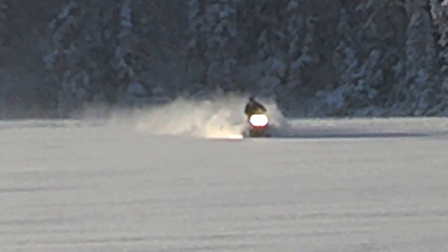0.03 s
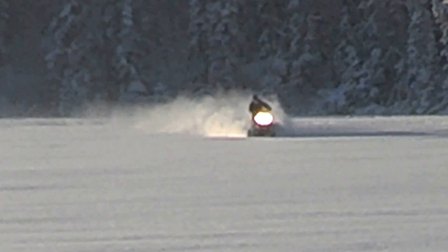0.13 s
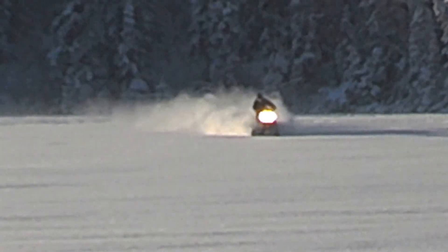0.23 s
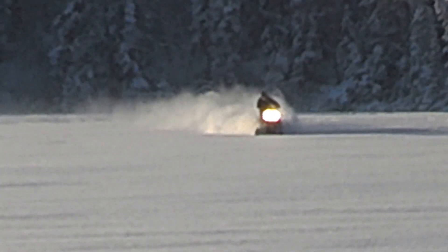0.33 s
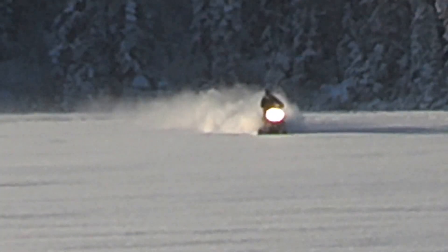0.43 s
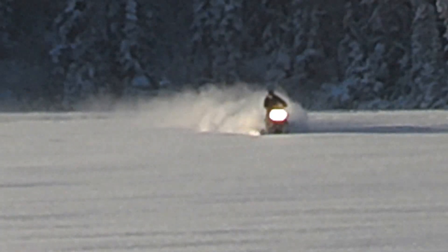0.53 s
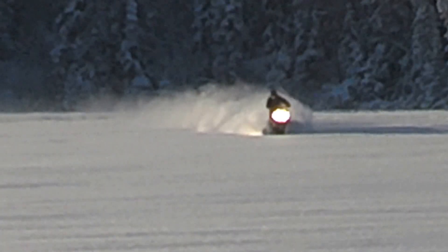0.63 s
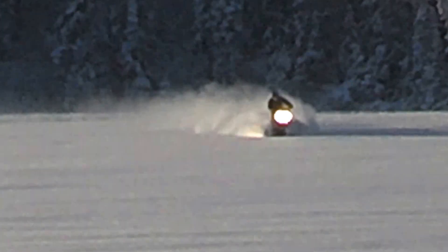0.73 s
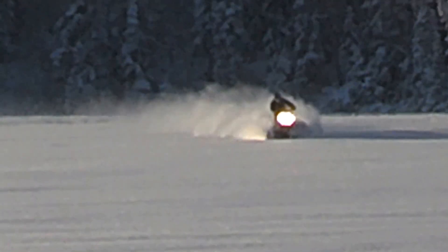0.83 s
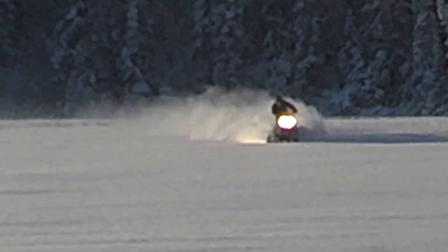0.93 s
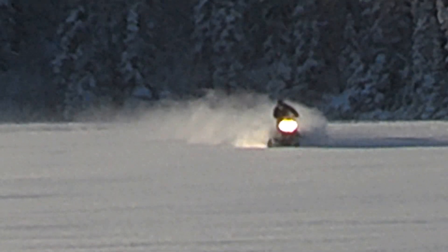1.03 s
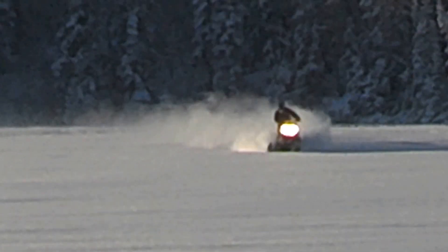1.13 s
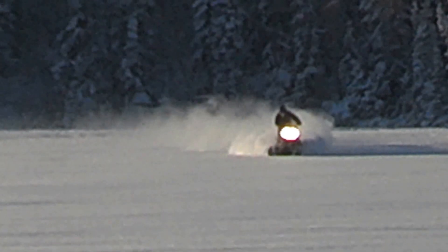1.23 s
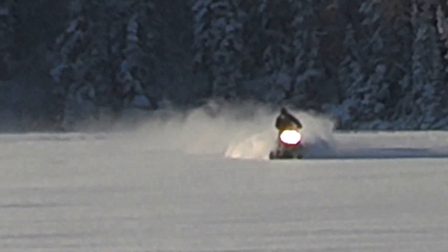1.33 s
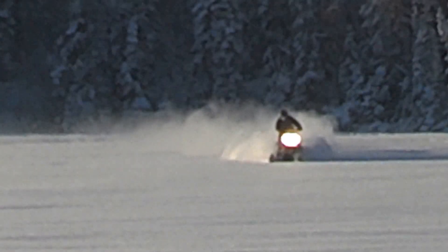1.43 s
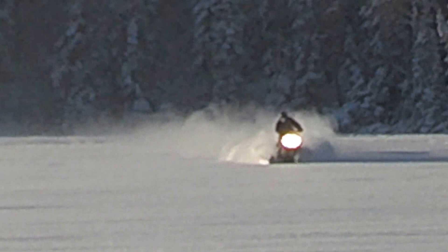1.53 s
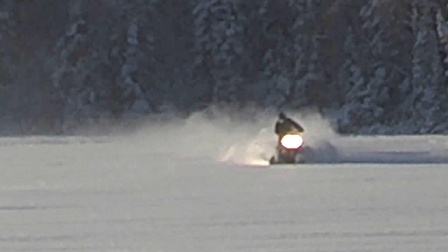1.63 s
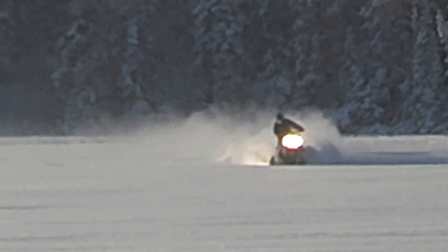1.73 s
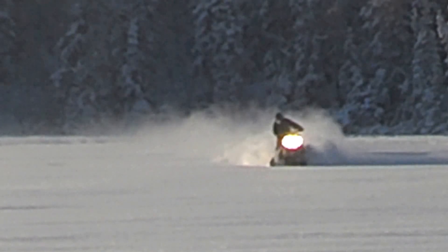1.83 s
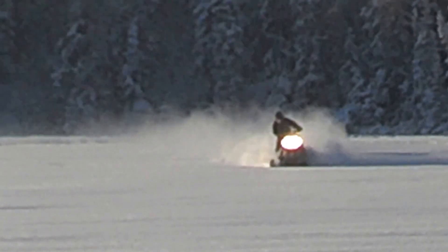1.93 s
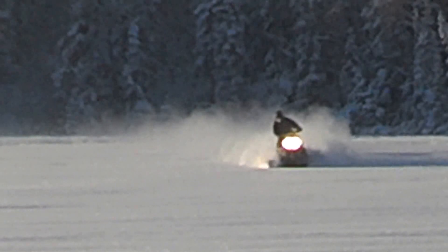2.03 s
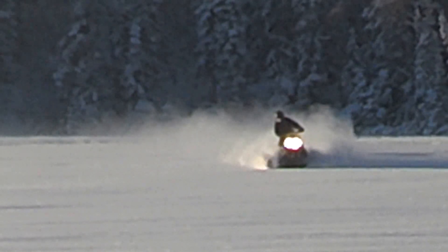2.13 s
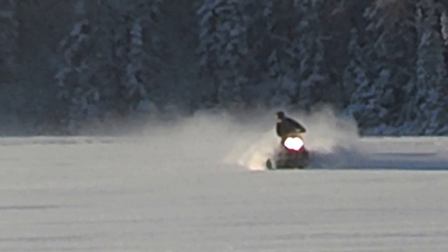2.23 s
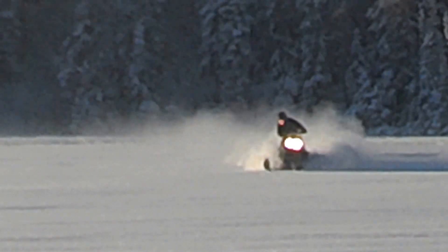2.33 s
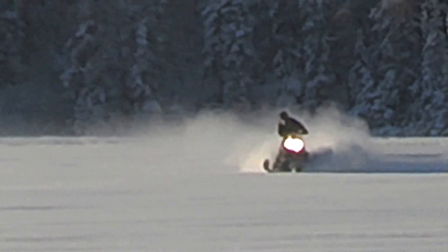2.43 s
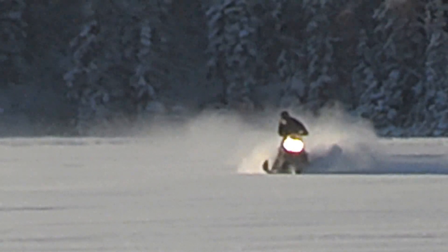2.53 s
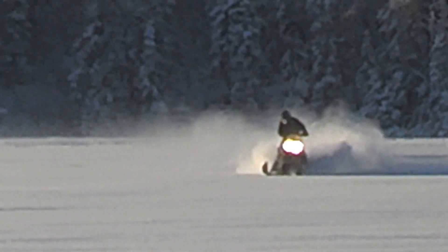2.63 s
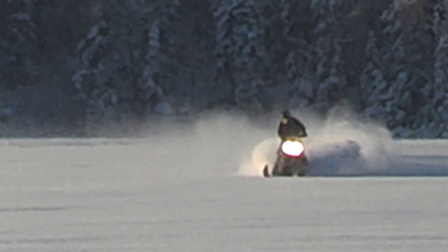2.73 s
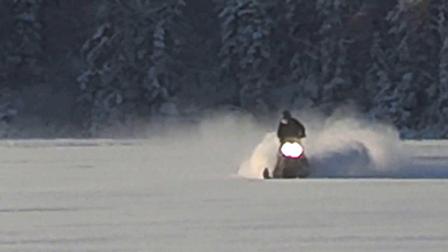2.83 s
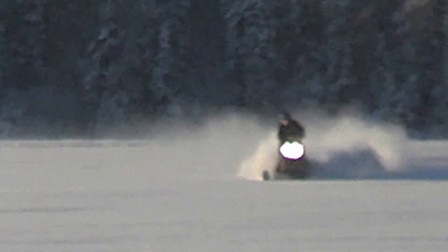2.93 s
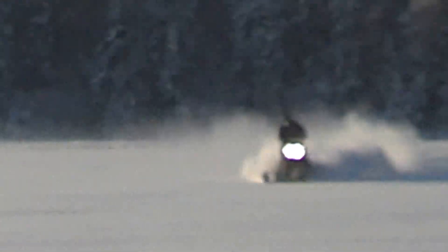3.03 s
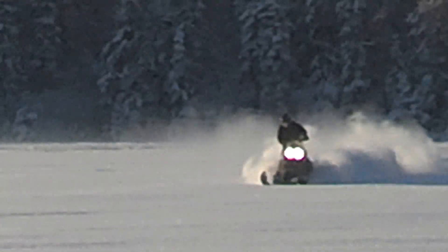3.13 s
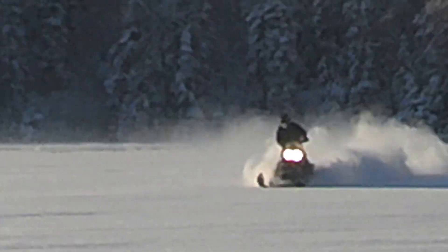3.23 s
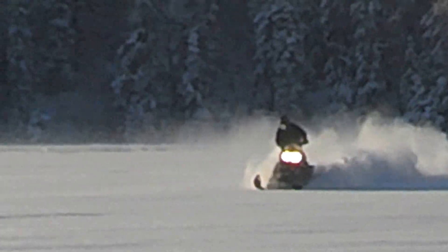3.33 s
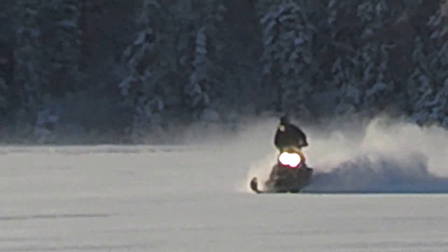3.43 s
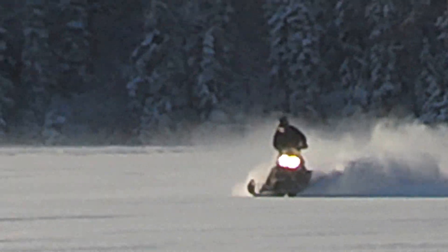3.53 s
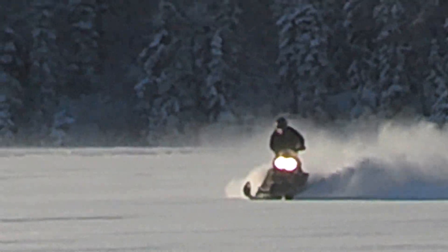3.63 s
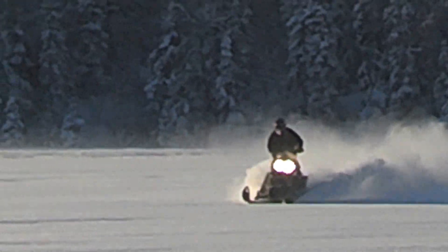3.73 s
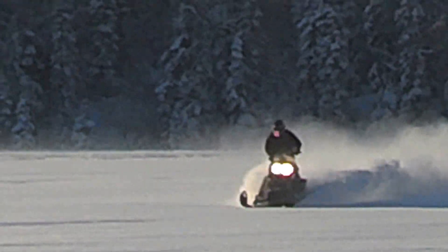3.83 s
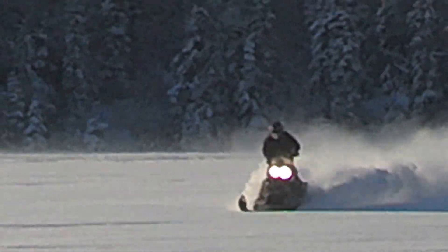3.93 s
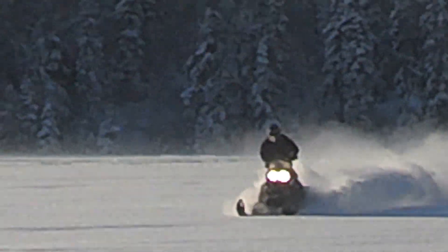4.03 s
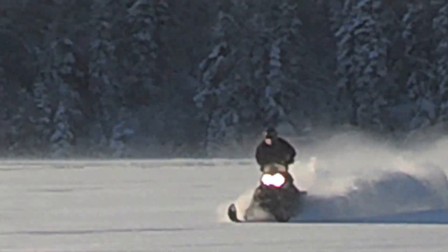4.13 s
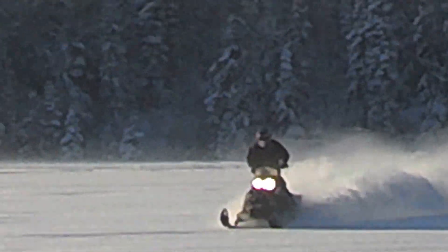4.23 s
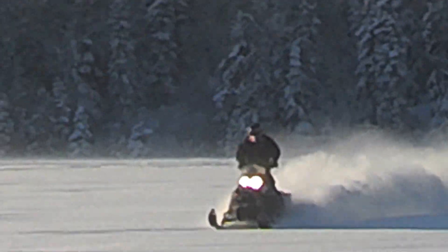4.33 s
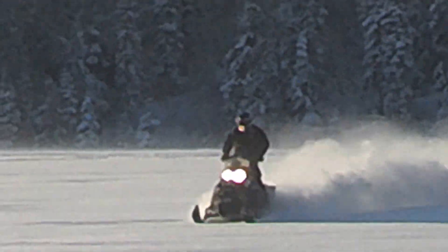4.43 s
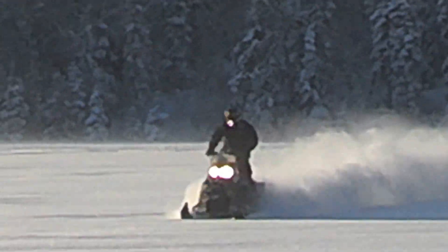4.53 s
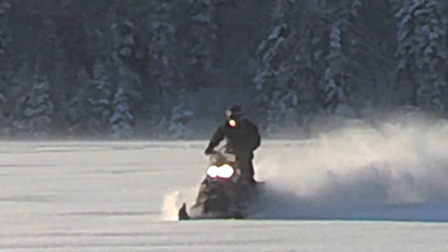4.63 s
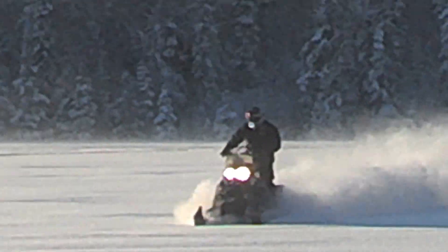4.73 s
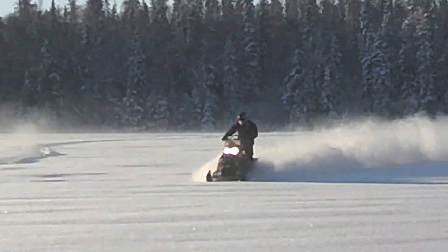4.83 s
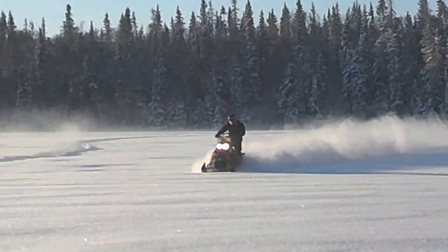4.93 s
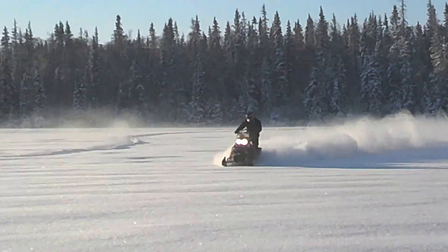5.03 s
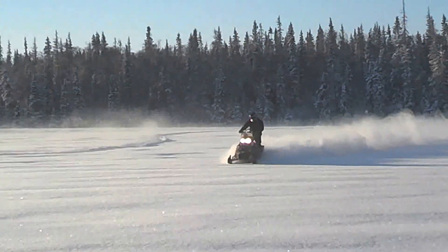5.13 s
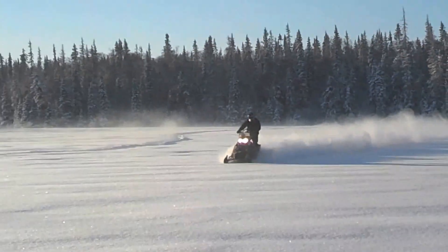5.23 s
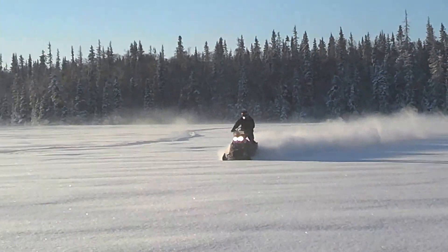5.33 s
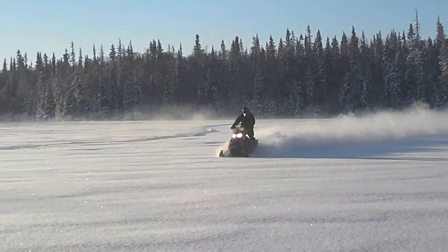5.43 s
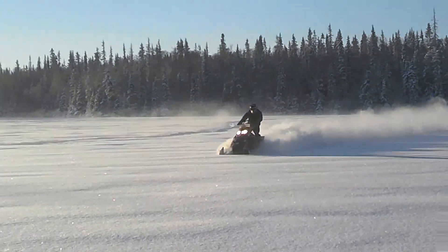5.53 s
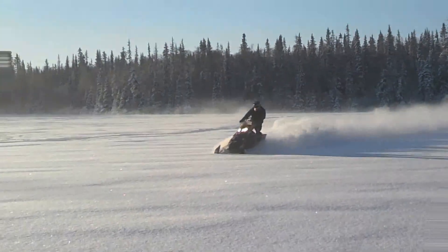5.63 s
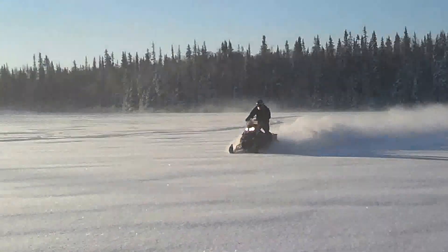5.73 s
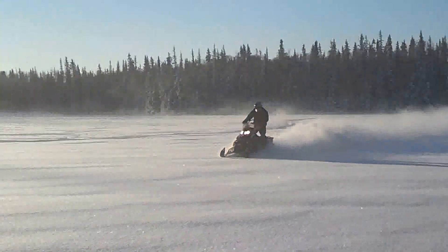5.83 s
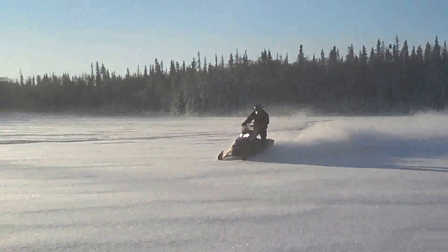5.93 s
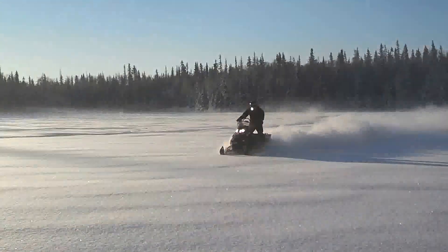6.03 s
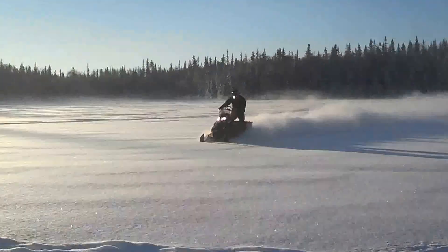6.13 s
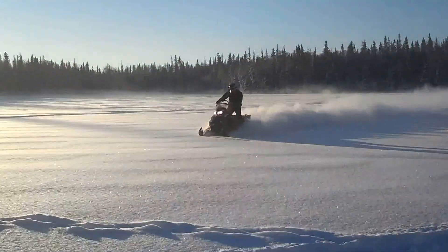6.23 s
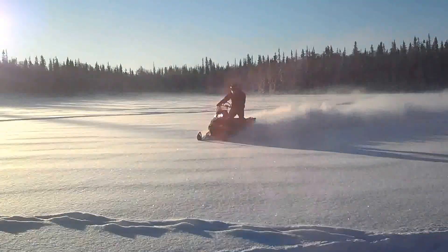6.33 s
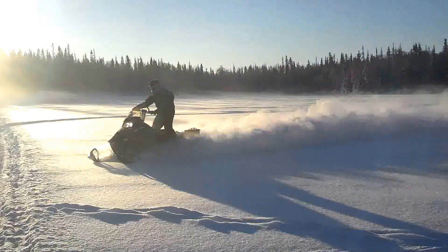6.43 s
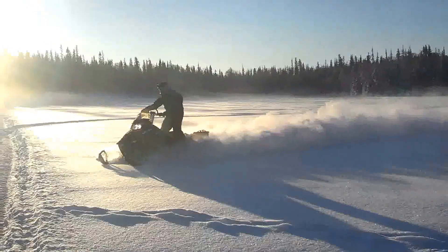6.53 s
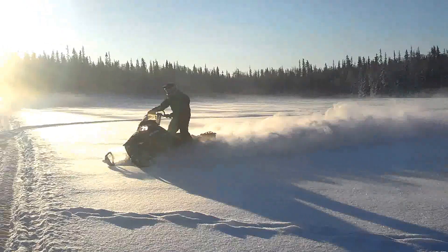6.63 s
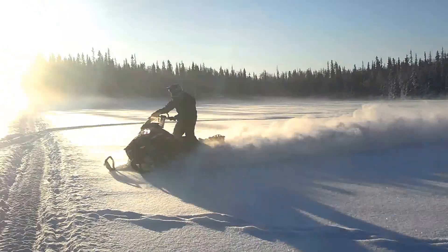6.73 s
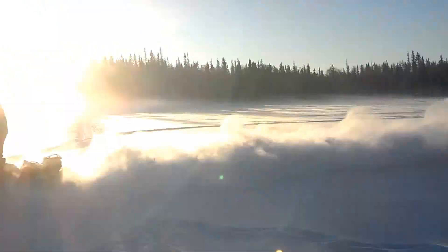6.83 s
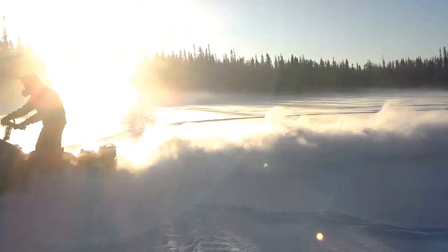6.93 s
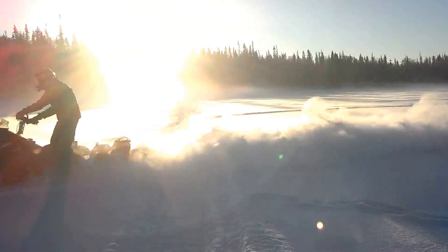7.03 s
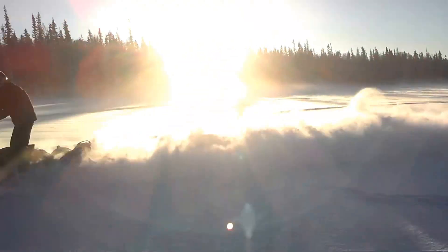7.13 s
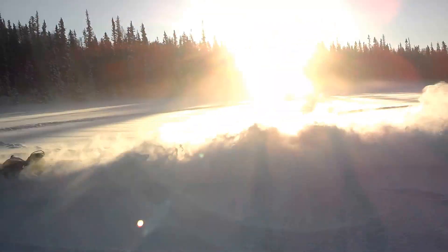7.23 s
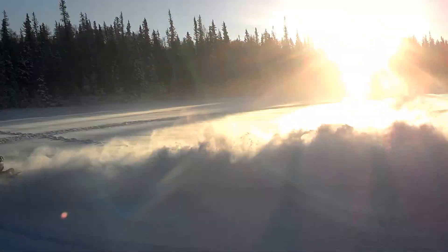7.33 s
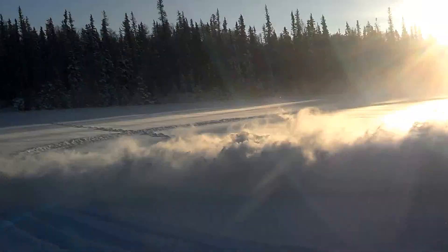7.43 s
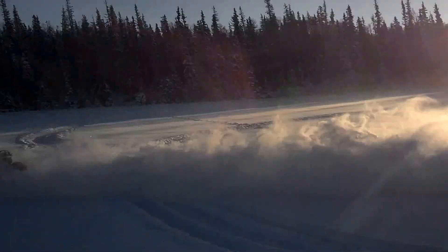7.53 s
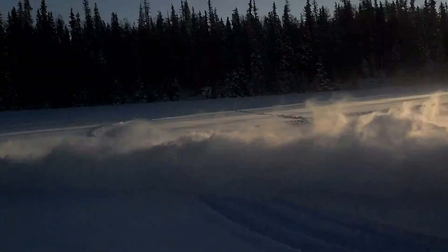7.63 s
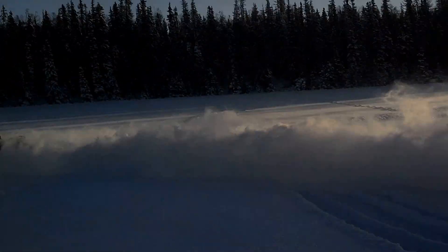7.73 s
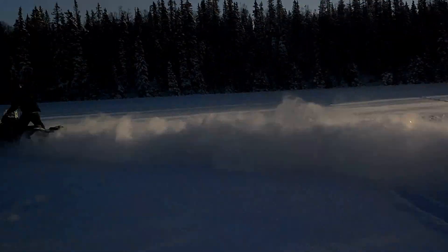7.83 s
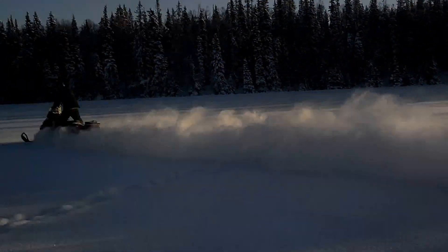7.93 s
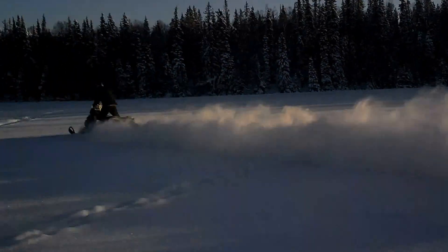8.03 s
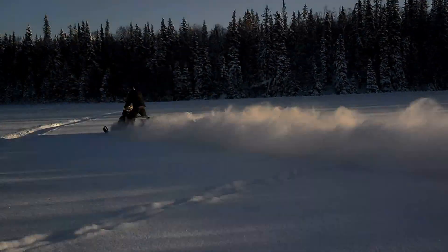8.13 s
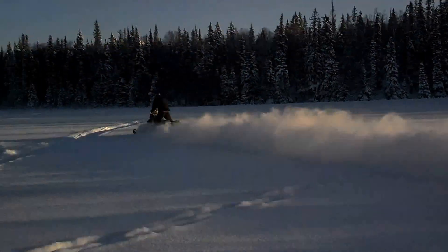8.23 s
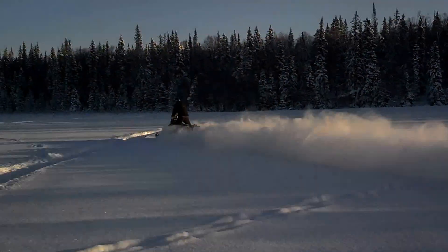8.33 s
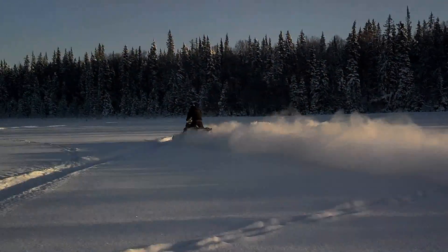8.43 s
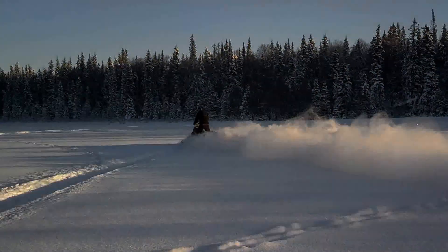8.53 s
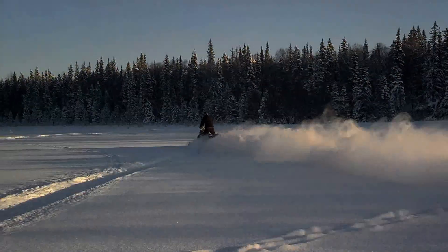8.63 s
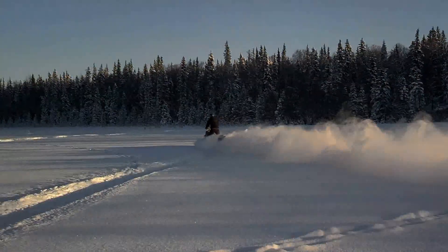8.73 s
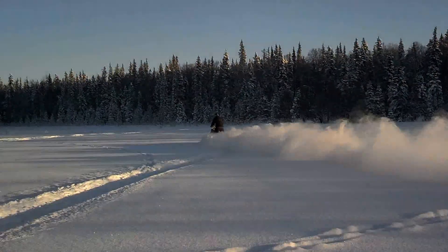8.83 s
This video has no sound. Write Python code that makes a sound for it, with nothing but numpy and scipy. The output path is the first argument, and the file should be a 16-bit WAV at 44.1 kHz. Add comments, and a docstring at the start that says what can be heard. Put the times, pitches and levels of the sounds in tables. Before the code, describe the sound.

Outdoors on a frozen lake, a second machine putters unevenly beside the microphone while a two-stroke snowmobile buzzes in the distance, its pitch wavering with throttle blips. It approaches, growing brighter and louder with churning track and hissing snow. Sound cuts out briefly, jolts back with a click as the sled passes, then its lowering, raspy buzz moves away. Dry open air, no echo.

```python
"""On open ice under soft snow, a two-stroke snowmobile crosses a frozen lake, passes close and pulls away.
Its exhaust is a row of crank orders swept through fixed pipe resonances as the throttle blips, with rasping puffs;
churning track and thrown snow are throbbing noise, and the lugs hum as it goes by. A second machine idles beside
the microphone, moving from right to left as the microphone turns: hum, puffs and knocks. Short rings, small bursts
and a faint hiss complete it. The sound cuts out briefly at the closest point and returns with a jolt."""
import sys
import numpy as np
from scipy import signal
from scipy.fft import rfft, irfft, next_fast_len
from scipy.io import wavfile
from scipy.ndimage import uniform_filter1d

SR = 44100
rng = np.random.default_rng(int(sys.argv[2]) if len(sys.argv) > 2 else 0)


def generate_wav(sig):
    """Save sig (samples, or channels by samples) to the path in sys.argv[1] as 16-bit PCM at SR."""
    pcm = np.round(np.clip(np.atleast_2d(sig).T, -1, 1) * 32767).astype(np.int16)
    wavfile.write(sys.argv[1], SR, pcm)


N = 391608
TIME, FREQ = np.arange(N) / SR, np.fft.rfftfreq(N, 1 / SR)


def amp(db):
    """Decibels to gain."""
    return 10 ** (np.asarray(db) / 20)


def unit(x):
    """Scales to rms 1."""
    return x / np.sqrt(np.mean(x ** 2) + 1e-20)


def curves(rows):
    """Each column of a table over time, at every sample."""
    s, *columns = np.transpose(rows)
    return [np.interp(TIME, s, c) for c in columns]


def spectra(rows):
    """Each dB column of a table over log frequency, as a gain at every bin."""
    hz, *columns = np.transpose(rows)
    return amp([np.interp(np.log(FREQ + 1), np.log(hz), c) for c in columns])


def filtered(x, gain):
    """Applies a gain given at every bin."""
    size = next_fast_len(N, True)
    hz = np.fft.rfftfreq(size, 1 / SR)
    return irfft(rfft(x, size) * np.interp(hz, FREQ, gain), size)[..., :N]


def wander(rate, times=TIME):
    """Slow chance of rms 1 that changes about rate times a second."""
    steps = rng.standard_normal(4096)
    return unit(np.interp(times * rate, np.arange(len(steps)), steps))


def panned(x, lead_db):
    """Shares the power between left and right; positive dB leans left."""
    ratio = amp(lead_db)
    return np.array([x * ratio, x]) * np.sqrt(2 / (1 + ratio ** 2))


# crankshaft speed as heard, at each move of the throttle: (t/s, f/Hz)
THROTTLE_REVS = [(0.0, 121.3), (0.13, 120.3), (0.3, 105.7), (0.52, 117), (0.65, 118.1), (0.94, 103.2),
                 (1.34, 116.7), (2.07, 117.5), (2.32, 126.1), (2.51, 127), (2.78, 118), (3.06, 125.7),
                 (3.27, 123.3), (3.47, 126.3), (3.68, 122.8), (3.9, 128.4), (5.41, 129.7), (5.67, 126.7),
                 (5.9, 130), (6.78, 125.5), (7.0, 113), (7.17, 109.1), (7.45, 112), (7.64, 106.6),
                 (7.95, 99.9), (8.22, 92.04), (8.58, 102.8), (8.88, 106.9)]
INERTIA_S = 0.088  # window over which inertia rounds off the throttle's moves


def crank():
    """Crank speed in Hz: the throttle's moves, rounded by inertia."""
    return uniform_filter1d(curves(THROTTLE_REVS)[0], int(INERTIA_S * SR), mode="nearest")


# side of the sled towards the microphone: (t/s, 0 far ahead, 1 approaching, 2 alongside, 3 from behind)
SLED_ASPECT = [(3.5, 0.49), (4.6, 0.97), (6.6, 1.3), (6.9, 2.1), (7.45, 2), (7.85, 3.042)]


def facing():
    """The share of each of the four sides of the sled over time."""
    side, = curves(SLED_ASPECT)
    return np.array([np.maximum(1 - abs(side - k), 0) for k in range(4)])


# the sled nears, passes and pulls away, before trims: (t/s, exhaust level/dB, churning track level/dB)
SLED_PASS = [(0, -41, -41), (.85, -46, -41), (1.7, -39.5, -42), (2.25, -39.5, -37.5), (2.75, -38.5, -37.5),
             (3.05, -35.5, -37), (4.6, -34, -32.5), (5.1, -27, -29.5), (5.6, -27.5, -27.5),
             (6.1, -25.5, -26.5), (6.9, -32, -31), (7.65, -29.5, -31), (8.0, -31, -32.5),
             (8.35, -25.5, -30), (8.6, -29.5, -30), (8.88, -31, -30)]
# resonances of the pipe and cowl: (f/Hz, half width/Hz where it is 9 dB down,
# level/dB far ahead, approaching, alongside, from behind)
PIPE_RESONANCES = [(250, 38, -23.5, -12, -10.5, -11.5), (461, 50, -6.5, -9, -5.5, -9.5),
                   (631, 60, -16, -15.5, -4.5, -13.5), (822, 59, -3.5, -12.5, -18, -21),
                   (963, 72, -20, -16, -12.5, -11), (1093, 147, -4.5, -13, -6.5, -8),
                   (1307, 120, -39, -14, -12, -33), (1455, 86, 2, -8.5, -22, -8.5),
                   (1617, 76, -35, -7, -8.5, -11), (1772, 45, -63, -11.5, -14, -9),
                   (2040, 73, -31, -15.5, -17.5, -21.5), (2270, 420, -42.5, -11.5, -15, -31),
                   (2820, 589, -50, -23.5, -37, -42), (4361, 67, -56, -23.5, -16, -58)]
# a crank order whines when the revs tune it to its resonance: (order, f/Hz, half width/Hz where it is
# 9 dB down, level/dB far ahead, approaching, alongside, from behind)
TUNED_WHINES = [(3, 385, 43, -32, -18.5, -10.5, -13), (4, 508, 19, -30, -21.5, -4.5, -9),
                (4, 459, 20, -3.5, -32, -22, -20), (5, 645, 35, -26, -11.5, -29, -26.5),
                (6, 775, 90, -20, -9.5, -4, -28), (6, 655, 38, -28, -28, -10, -3.5),
                (8, 930, 45, -5, -24.5, -21, -25), (9, 1116, 59, 9.5, -5.5, -9, -12),
                (12, 1500, 56, -1, -14.5, -16.5, -23), (14, 1640, 27, -3.5, -25, -21.5, -14),
                (15, 1945, 90, -29, -8.5, -29.5, -24), (17, 1660, 43, -29, -30, -20, -8)]
# as the sled weaves and turns, single orders sing out for a moment: (t/s, length/s, order, level/dB)
ORDER_SURGES = [(0.457, .2, 12, -41), (.48, 0.25, 8, -45), (1.1, 0.44, 11, -43), (1.328, 0.43, 8, -42),
                (1.454, 0.65, 4, -46.5), (2.168, 0.36, 8, -41), (2.35, 0.75, 9, -39), (2.743, 0.53, 6, -46),
                (3.652, 0.31, 4, -43.5), (4.45, 1.6, 15, -40.5), (5.36, .2, 9, -34), (5.42, .3, 17, -42.5),
                (5.548, .5, 8, -35), (5.575, 0.63, 15, -35), (5.62, 0.66, 7, -47), (5.63, .25, 12, -36),
                (5.667, 0.31, 9, -26), (5.704, 0.28, 4, -35.5), (5.702, .3, 14, -39.5),
                (5.997, .3, 10, -34), (6.02, .2, 11, -37), (6.048, 0.43, 13, -35.5), (6.08, .3, 16, -42),
                (6.102, 0.455, 14, -35.5), (6.123, 0.67, 9, -32), (6.167, 0.46, 5, -30.5),
                (6.8, .25, 4, -35.5), (6.84, 0.35, 9, -37.5), (6.9, .15, 5, -38), (7.022, .2, 10, -38),
                (7.2, 0.22, 7, -42), (7.27, .3, 12, -50), (7.302, .3, 18, -42), (7.333, 0.38, 8, -40),
                (7.38, 0.31, 6, -30), (7.43, .27, 16, -38), (7.495, .3, 11, -39), (7.657, .26, 6, -32.5),
                (7.652, .25, 9, -37.5), (7.646, .2, 14, -33.5), (7.85, .3, 18, -46), (7.955, 0.29, 5, -40),
                (8.1, 0.22, 18, -34), (8.22, .16, 12, -41), (8.254, 0.22, 7, -41), (8.36, .16, 16, -34),
                (8.426, 0.16, 18, -33.5), (8.55, .15, 6, -41), (8.55, .15, 4, -43), (8.7, 0.62, 8, -36.5),
                (8.7, .35, 11, -38), (8.75, .3, 10, -38.5)]
# over distance the snow soaks up the top of the buzz: (t/s, level/dB at SOAK_HZ)
SNOW_SOAK = [(2, -14), (3.7, -5.5), (4.6, 0)]
SOAK_HZ = 3000
# alongside and from behind, the plume of snow breaks up each order: depth in dB, changes a second
PLUME_FADING_DB, PLUME_FADING_RATE = 1.8, 11


def exhaust(turns, sides, buzz_db=-0.92, whine_db=0.3, fundamental_db=-22, flutter_db=2.25,
            whine_flutter_db=1.56, flutter_rate=14, fading_db=2.1, fading_rate=3.5, count=40):
    """Crank orders sweep through the pipe's fixed resonances, fluttering and fading on their way over the snow."""
    step = 256  # samples between the points where heights are worked out
    slow, crank_hz, sides = TIME[::step], crank()[::step], sides[:, ::step]
    level, soak = curves(SLED_PASS)[0][::step], curves(SNOW_SOAK)[0][::step]
    plume = sides[-1] + sides[-2]
    pipe = np.array(PIPE_RESONANCES)
    centre, width = pipe[:, :1], pipe[:, 1:2]
    heard = amp(pipe[:, 2:]) @ sides

    heights = {1: amp(level + fundamental_db)}
    for k in range(2, count):
        power = heard ** 2 / (1 + ((k * crank_hz - centre) / width) ** 2) ** 3
        waver = flutter_db * wander(flutter_rate, slow) + fading_db * wander(fading_rate, slow)
        waver = waver + PLUME_FADING_DB * plume * wander(PLUME_FADING_RATE, slow)
        loss = soak * (k * crank_hz / SOAK_HZ) ** 3
        heights[k] = amp(level + buzz_db + waver + loss) * np.sqrt(power.sum(0))

    for k, hz, width, *side_db in TUNED_WHINES:
        tuned = (1 + ((k * crank_hz - hz) / width) ** 2) ** -1.5
        flutter = whine_flutter_db * wander(flutter_rate, slow)
        whine = amp(level + whine_db + flutter) * tuned * (amp(side_db) @ sides)
        heights[k] = np.hypot(heights[k], whine)

    for s, length, k, db in ORDER_SURGES:
        flutter = whine_flutter_db * wander(flutter_rate, slow)
        surge = amp(db + flutter) * np.exp(-(2 * (slow - s) / length) ** 2)
        heights[k] = np.hypot(heights[k], surge)

    angle = (2 * np.pi * (turns % 1)).astype(np.float32)
    out = np.zeros(N)
    for k, height in heights.items():
        out += np.interp(TIME, slow, height) * np.sin(k * angle + 2 * np.pi * rng.random())
    return np.sqrt(2) * out


# colour of the gas rasping out of the pipe at each firing: (f/Hz, level/dB)
RASP_COLOUR = [(2200, -16), (2600, -1), (2950, 3.5), (3300, -2.5), (3700, -1.5), (4200, -7.5), (5000, -19),
               (7000, -24)]
# rasp against the exhaust: (level/dB far ahead, approaching, alongside, from behind)
RASP_BY_SIDE = [-32, -23, -35.5, -11.5]


def rasp(turns, sides, puff_decay=.4, lumps_db=2.5):
    """Each firing lets out a puff of hiss that sinks through the turn, heard best from behind."""
    puffs = rng.standard_normal(N) * (.5 + np.exp(-(turns % 1) / puff_decay))
    level = curves(SLED_PASS)[0] + np.array(RASP_BY_SIDE) @ sides + lumps_db * wander(40)
    return amp(level) * unit(filtered(puffs, spectra(RASP_COLOUR)[0]))


# colour of the churning track: (f/Hz, level/dB far ahead, approaching, alongside, from behind)
CHURN_COLOURS = [(60.6, -30, -38.5, -35, -44), (149.4, 2, -4, -18.5, -18), (298.9, 1.5, -10, -3.5, -2),
                 (524, -5, -2, 3, -1.5), (820, 0.5, -4.5, -2, -5), (1086, 1.5, -1, 1.5, 0),
                 (1516, 1, 4.5, -4, -1), (1720, -38, -2, -3, 0.5), (1940, -24, -3.5, -5, -7),
                 (2530, -4.5, -5.5, -1, -1.5), (2880, -17.5, -12, -14.5, -21), (4460, -48, -32, -23, -25.5)]
# colour of the thrown snow: (f/Hz, level/dB far ahead, approaching, alongside, from behind)
SPRAY_COLOURS = [(1494, -26, -22.5, -35.5, -27.5), (2240, 7, 4.5, -13, -6.5), (2760, 5, 3, 2.5, -4),
                 (3220, -2.5, -3, 3, 1), (3700, 3.5, 5.5, -1.5, 9), (4300, 0, 1, 7, 0),
                 (4760, 4.5, 6, 3, -1), (5320, 9, 3.5, 5.5, -1), (7800, -10.5, -7, -9.5, -9.5),
                 (8980, -7.5, -3.5, -3.5, -4.5), (12270, -3.5, -6, -16, -21.5),
                 (15500, -6, -3, -13.5, -12.5)]
# spray lift by side: (level/dB far ahead, approaching, alongside, from behind)
SPRAY_BY_SIDE = [0.5, 1.3, 3.1, 4.4]
# thrown snow follows the churning but swells faster: its level, before lift and trim, at CHURN_NEAR_DB
SPRAY_NEAR_DB, CHURN_NEAR_DB, SPRAY_DB_PER_DB = -38, -27, 1.67


def snow(turns, sides, churn_db=1.5, spray_db=1, pulsing=0.071, lumps_db=1.16, grain_db=0.1, drifts_db=1.0):
    """Track churn and thrown snow: noises that throb with the crank, come in lumps and swell in the drifts."""
    throb = unit(1 + pulsing * np.cos(2 * np.pi * turns) + pulsing * np.cos(4 * np.pi * turns) / 2)
    lumps = amp(lumps_db * wander(45) + grain_db * wander(400))
    churn = curves(SLED_PASS)[1] + drifts_db * np.tanh(wander(6.6))
    spray = SPRAY_NEAR_DB + SPRAY_DB_PER_DB * (churn - CHURN_NEAR_DB) + np.array(SPRAY_BY_SIDE) @ sides
    layers = [(churn + churn_db, CHURN_COLOURS, .25), (spray + spray_db, SPRAY_COLOURS, .6)]
    out = np.zeros((2, N))
    for level, colours, spread in layers:
        # one noise shared by both channels, plus some of each channel's own
        noise = rng.standard_normal(N) + spread * rng.standard_normal((2, N))
        noise = noise * throb * lumps
        coloured = sum(side * unit(filtered(noise, colour)) for side, colour in zip(sides, spectra(colours)))
        out += amp(level) * coloured
    return out


# the side of the track shows as the sled goes by: (t/s, hum level/dB)
TRACK_EXPOSED = [(6.3, -56), (6.76, -39.5), (7.08, -32.5), (7.42, -34.5), (7.52, -44.5), (8.3, -45)]
# partials of the hum: (multiple of the lug rate, level/dB)
LUG_PARTIALS = [(1, -6.5), (2, -1.5), (3, -5.5), (4, -3)]
LUGS_PER_TURN, CLUTCH_LAG_S = 1.245, 0.0397  # the track follows the crank through the clutch


def track(flutter_db=0.0):
    """The lugs hum while the side of the track is exposed, falling in pitch with the revs."""
    level, = curves(TRACK_EXPOSED)
    lug_hz = LUGS_PER_TURN * np.interp(TIME - CLUTCH_LAG_S, TIME, crank())
    lugs = np.cumsum(lug_hz) / SR + .022 * wander(30)
    out = np.zeros(N)
    for k, db in LUG_PARTIALS:
        height = amp(level + db + flutter_db * wander(23))
        out += height * np.sin(2 * np.pi * (k * lugs + rng.random()))
    return np.sqrt(2) * out


# balance of the sled between the channels: (f/Hz, left-right level/dB far ahead, approaching,
# alongside, from behind)
SLED_BALANCE = [(150, -0.5, 0.5, 6, 9), (298.1, -10, 0, 12, 3.5), (713.5, 3, 3, 9, 4),
                (1110, 2.5, 0.5, 5.5, 1.5), (1678, -4.5, 0.5, -11.5, -3), (1850, 2, -5.5, -3, -13.5),
                (2350, -4.5, -17, 16.5, -4.5), (3000, -15, -18, 19, 3), (3410, 1, 2.5, 3.5, -6.5),
                (4100, 1.5, -0.5, -1, 0)]
# from behind, and half as much alongside, the plume smears the crank's timing: turns, changes a second
PLUME_TURNS, PLUME_RATE = .0065, 35


def rider():
    """The moving sled: one unsteady crank drives its sounds, placed left or right by where it is."""
    sides = facing()
    turns = np.cumsum(crank()) / SR + .003 * wander(130) + .0035 * wander(22)
    turns = turns + PLUME_TURNS * wander(PLUME_RATE) * (sides[-1] + sides[-2] / 2)
    sound = exhaust(turns, sides) + rasp(turns, sides) + track() + snow(turns, sides)
    out = np.zeros((2, N))
    for side, ratio in zip(sides, spectra(SLED_BALANCE)):
        right = np.sqrt(2 / (1 + ratio ** 2))
        out += side * np.array([filtered(sound[0], ratio * right), filtered(sound[1], right)])
    return out


# the idling machine as the microphone turns, before trims: (t/s, level/dB, left-right level/dB)
IDLER_PLACE = [(0, -35, -21), (5.5, -35, -30.5), (6.3, -40.5, -11.5), (6.78, -40.5, -6.5), (6.9, -52.5, -1),
               (7.9, -38, 10.5), (8.2, -38.5, 15), (8.35, -35.5, 11.5)]
# muffler hum: (multiple of the firing rate, level/dB)
IDLER_ORDERS = [(2, -14.5), (2.5, -38), (3, -1), (3.5, -18), (4, -8), (4.5, -28.5), (5, -11.5),
                (5.5, -25.5), (6, -18), (7, -10)]
# colour of its puffs: (f/Hz, level/dB)
PUFF_COLOUR = [(45, -42.5), (75, -14.5), (125, -2.5), (200, -2), (290, 0.5), (420, 2), (600, 0.5), (850, 0),
               (1300, -12.5), (1800, -50), (4000, -65)]
# colour of its mechanical knocks: (f/Hz, level/dB)
KNOCK_COLOUR = [(500, -18), (900, -3.5), (1150, 7), (1450, -12.5), (1900, -15.5), (4000, -30), (9000, -40)]
IDLE_HZ, HUNT_HZ, HUNTS_PER_S = 40.08, .7, 5.5  # firing rate, and how it hunts


def idler(hum_db=0, puff_db=-1, knock_db=-7.5, uneven=.03, flutter_db=1.5, puff_decay=.45,
          puff_pan=1.0, knock_pan=0.064):
    """An uneven idle close by: muffler hum, and a puff and a mechanical knock at each firing."""
    rate = IDLE_HZ + HUNT_HZ * wander(HUNTS_PER_S)
    level, pan = curves(IDLER_PLACE)
    firings = np.cumsum(rate) / SR + uneven * wander(25)

    hum = np.zeros(N)
    for k, db in IDLER_ORDERS:
        hum += amp(db + flutter_db * wander(20)) * np.sin(2 * np.pi * (k * firings + rng.random()))
    hum *= np.sqrt(2)

    puffs = rng.standard_normal(N) * (0.99 + np.exp(-(firings % 1) / puff_decay))
    puffs = unit(filtered(puffs, spectra(PUFF_COLOUR)[0]))

    stroke = firings + .25
    # one cylinder knocks harder than the other
    strength = (rng.uniform(.55, 1, 800) * np.tile([.5, 1], 400))[stroke.astype(int)]
    knocks = rng.standard_normal(N) * strength * np.exp(-(stroke % 1) / .22)
    knocks = unit(filtered(knocks, spectra(KNOCK_COLOUR)[0]))

    # hum and puffs lean fully to one side, the higher knocks hardly at all
    out = panned(amp(hum_db) * hum, pan)
    out += panned(amp(puff_db) * puffs, puff_pan * pan)
    out += panned(amp(knock_db) * knocks, knock_pan * pan)
    return amp(level) * out


# first the hardest knocks of the idling machine, then the click as the sound jumps back in,
# and ticks and crackles as the sled leaves: (t/s, ring f/Hz, decay/s, level/dB at the strike)
SHARP_CLACKS = [(0.221, 1150, .002, -22), (0.421, 1200, .002, -22), (0.71, 1150, .002, -23),
                (1.061, 1100, .0025, -21.5), (1.111, 1150, .0025, -21.5), (1.213, 1150, .0025, -21.5),
                (1.364, 1200, .0025, -21), (1.413, 1100, .002, -22), (6.7605, 1150, .0011, -10.5),
                (8.162, 1200, .003, -14.5), (8.242, 1500, .002, -16), (8.251, 1400, .002, -16),
                (8.426, 1500, .0015, -15)]


def clacks():
    """Sharp clacks and clicks: sines with a very short exponential ring."""
    out, t = np.zeros(N), np.arange(1024) / SR
    for s, hz, decay, db in SHARP_CLACKS:
        start = round(s * SR)
        out[start:start + len(t)] += amp(db) * np.exp(-t / decay) * np.sin(2 * np.pi * hz * t)
    return out


# small ticks and bumps, and the burst of noise as the sound jumps back in:
# (t/s, length/s, centre f/Hz, width/octaves, level/dB, left-right level/dB)
NOISE_BURSTS = [(2.719, .025, 1950, .17, -38, 0), (3.044, .007, 13500, .5, -34, 0),
                (3.349, .03, 13500, .28, -39.5, 0), (6.78, .04, 1400, .5, -28, 0),
                (8.515, .035, 250, .6, -27, -4)]


def bursts(size=8192):
    """Short swells of noise, each in its own band."""
    out = np.zeros((2, N))
    t, bins = (np.arange(size) - size / 2) / SR, np.fft.rfftfreq(size, 1 / SR)
    for s, length, hz, octaves, db, pan in NOISE_BURSTS:
        band = np.exp(-(np.log2((bins + 1) / hz) / octaves) ** 2 / 2)
        noise = unit(irfft(rfft(rng.standard_normal(size)) * band))
        swell = noise * np.exp(-(2 * t / length) ** 2)
        start = round(s * SR) - size // 2
        out[:, start:start + size] += panned(amp(db) * swell, pan)
    return out


# colour of the faint steady hiss under everything: (f/Hz, level/dB)
HISS_COLOUR = [(1500, -1), (2800, 0.5), (3500, 2), (4800, 2), (7000, -5.5), (15000, -4.5)]
HISS_DB = -58


def hiss():
    """A smooth floor of treble noise, half shared by both channels."""
    noise = rng.standard_normal(N) + rng.standard_normal((2, N))
    return amp(HISS_DB) * unit(filtered(noise, spectra(HISS_COLOUR)[0]))


def scene():
    """Open ice and soft snow: no echo."""
    return rider() + idler() + clacks() + bursts() + hiss()


# the sound cuts out and jumps back in: (t/s, gain)
CUT_AND_JOLT = [(6.332, 1), (6.336, 0), (6.753, 0), (6.756, 1.4), (6.762, 2.5), (6.797, 2.4), (6.808, 1)]
# phase by which the left channel leads: (f/Hz, lead/half turns)
LEFT_LEAD = [(0, .4), (350, .3), (700, .04), (1650, 0), (2250, -.9), (2756.25, -1), (4134.375, 0),
             (22050, 13)]
# at each multiple of PORT_HZ the channels carry nearly one sound, in or out of phase;
# WIDE_SHARE is the share of the step between multiples that is wide
PORT_HZ, WIDE_SHARE = 1378.125, .66
EDGE_HZ = 15850  # upper band limit


def record(dry):
    """Stereo microphone: treble in or out of phase by turns, wide only between; then dropout and band limit."""
    step, within = np.divmod(FREQ / PORT_HZ, 1)
    turning = np.clip((within - .5) / WIDE_SHARE + .5, 0, 1)
    treble = FREQ > 1.5 * PORT_HZ
    lead_hz = np.where(treble, PORT_HZ * (step + turning), FREQ)
    lead = np.pi * np.interp(lead_hz, *np.transpose(LEFT_LEAD))
    width = np.where(treble, np.maximum(np.sin(np.pi * turning), 0) ** .5 + .03, 1)
    mid, side = dry.mean(0), filtered((dry[0] - dry[1]) / 2, width)
    left, right = mid + side, filtered(mid - side, np.exp(-1j * lead))
    wide = np.array([left, right]) * curves(CUT_AND_JOLT)[0]
    lowpass = signal.firwin(801, EDGE_HZ, window=("kaiser", 9), fs=SR)
    return signal.oaconvolve(wide, lowpass[None], "same")


dry = scene()
out = record(dry)
generate_wav(out)
```